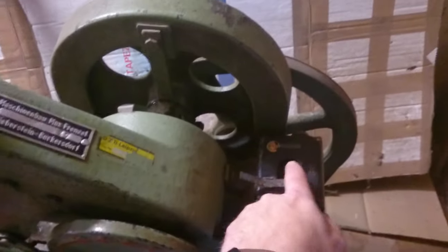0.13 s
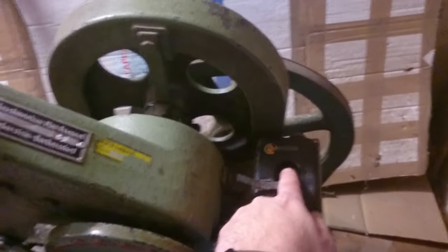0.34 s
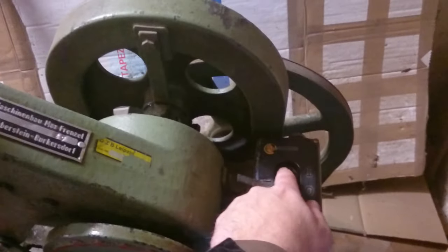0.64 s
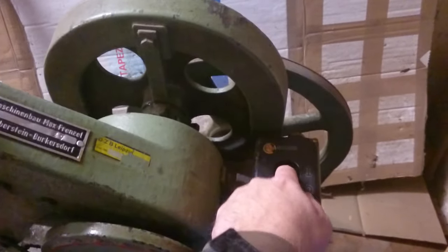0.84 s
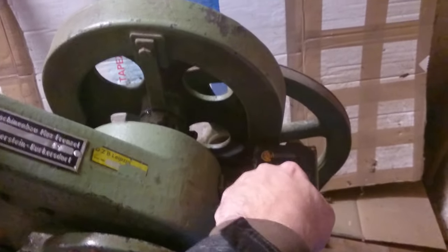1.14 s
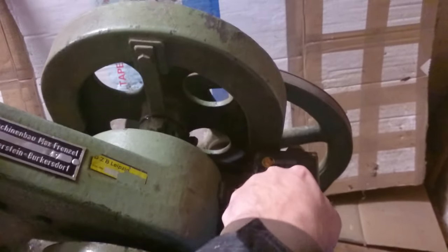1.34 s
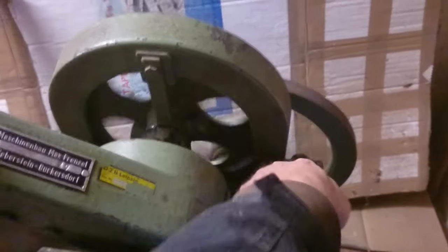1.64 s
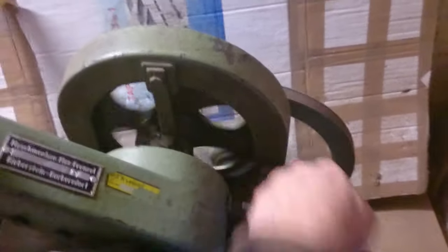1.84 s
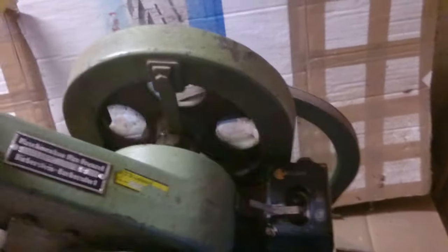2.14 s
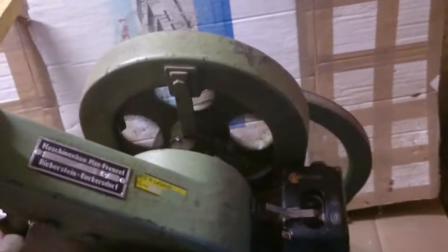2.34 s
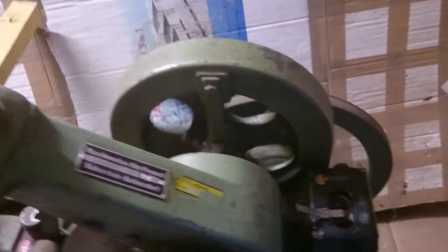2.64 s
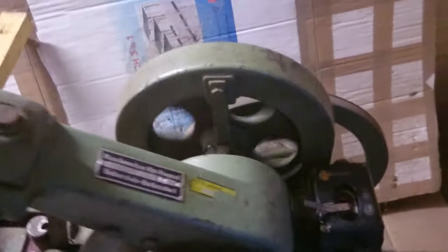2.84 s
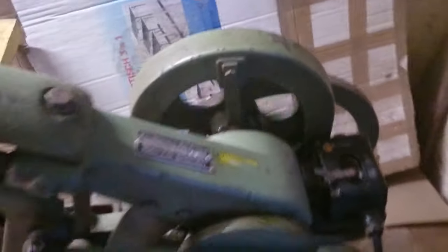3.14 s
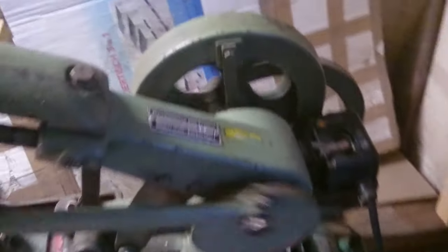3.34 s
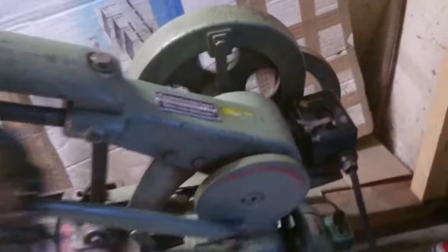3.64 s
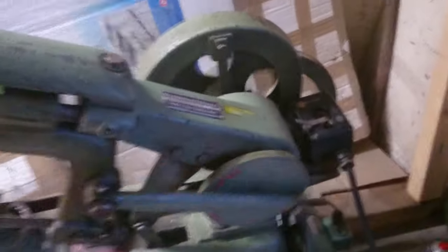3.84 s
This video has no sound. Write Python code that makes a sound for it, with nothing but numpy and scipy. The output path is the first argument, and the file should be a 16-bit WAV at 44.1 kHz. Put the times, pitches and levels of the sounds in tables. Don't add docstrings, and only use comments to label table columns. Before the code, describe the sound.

A power hacksaw starts with a hard knocking jolt and runs with gear rattle and rhythmic metal clacks

```python
import sys
import numpy as np
from scipy import signal
from scipy.fft import rfft, irfft
from scipy.io import wavfile
from scipy.ndimage import uniform_filter1d

SR = 44100
rng = np.random.default_rng(int(sys.argv[2]) if len(sys.argv) > 2 else 0)


def master_out(mix):
    frames = np.transpose(np.atleast_2d(mix))
    ceiling = np.clip(frames, -1, 1)
    pcm = np.round(ceiling * 32767).astype(np.int16)
    wavfile.write(sys.argv[1], SR, pcm)


def volts(x):
    e = np.asarray(x, float) / 20
    return 10 ** e


N = 176400
START_S, START_RISE_S = 1.460, 0.0046
FLICKER_DB = 1.7

# freq_hz, density_db
STILL_COLOUR = [(25, -2), (60, 14.5), (150, -1), (300, -7.5), (1200, -0.5), (3000, -2.5), (6600, -9.5),
                (16000, -43)]
# time_s, level_db
SLEEVE_LEVEL = [(0, -51.5), (.15, -49.5), (.3, -53.5), (.35, -64.5), (.53, -58.5), (.62, -60.5), (.66, -85),
                (.77, -68.5), (.85, -62.5), (1.07, -58), (1.2, -65.5), (1.44, -66)]
# freq_hz, density_db
SLEEVE_COLOUR = [(120, -66), (273, -23), (548, -27.5), (1320, -8), (2000, -12.5), (4600, -12), (6640, -1.5),
                 (16000, -15.5)]
# start_s, peak_db, pitch_hz
TICKS = [
    (0.426, -59, 1320),
    (0.436, -55, 5100),
    (1.13, -49, 1540),
    (1.312, -89.5, 1500),
    (1.376, -44, 1900),
    (1.378, -46.5, 3960),
    (1.394, -50, 1170),
    (1.423, -56, 920),
    (1.449, -53, 965),
]
# time_s, level_db
GEAR_LEVEL = [(1.46, -20.5), (1.62, -27), (1.75, -30.5), (2.0, -30.5), (2.45, -32), (2.7, -30), (3.2, -33),
              (3.4, -28.5), (3.7, -34.5), (4.0, -30.5)]
# freq_hz, density_db
GEAR_COLOUR = [(30, -26), (250, -29.5), (500, -9), (1000, -2), (1350, 5), (2100, -3), (2800, -13),
               (4800, -22)]
FRAME_HZ = [384, 507, 638, 787, 1055, 1254, 1412, 1917, 1975, 2206, 2460, 2650, 3120, 3540]
FRAME_MODE_DB = [-23, -22, -18, -13, -12, -10, -3, 1, 3, -7, -14, -15, -18, -17]
MESH_BAND_HZ = [1700, 2450]
# time_s, gain_db
MESH_GAIN = [(1.46, -27), (1.6, -11), (1.7, -2), (1.95, -1.5), (2.2, 0), (2.35, 2.5), (2.6, 1.5),
             (2.9, -2.5), (3.1, 1), (3.3, 0.5), (3.6, 0.5), (3.75, 2.5), (4.0, 1.5)]
# time_s, level_db
HISS_LEVEL = [(1.46, -49), (1.62, -48), (1.78, -48), (1.82, -53.5), (1.9, -47), (2.03, -49.5), (2.2, -53),
              (2.42, -49.5), (2.6, -52.5), (2.75, -53), (3.2, -54.5), (3.5, -55), (3.7, -56), (3.83, -54.5),
              (4.0, -53.5)]
# freq_hz, density_db
HISS_COLOUR = [(2500, -29), (4500, -15.5), (6700, -2), (8500, -10.5), (10000, -19)]
# start_s, peak_db, pitch_hz
KNOCKS = [(1.46, -14, 1026), (1.465, -12, 1070), (1.468, -6.5, 1430), (1.475, -20, 1320), (1.482, -3, 1058),
          (1.49, -13, 1116), (1.498, -12, 1260), (1.509, -13, 1470), (1.526, -14, 1360), (1.534, -2, 1466),
          (1.553, -13, 1453), (1.558, -21, 1530), (1.56, -7, 1406), (1.576, -26, 1440), (1.608, -29, 1484),
          (2.017, -10, 1234), (2.037, -22, 2170), (2.036, -12, 1254), (2.05, -15, 1180), (2.075, -23, 1340),
          (2.092, -18.5, 1135), (2.786, -9, 2000), (2.79, -33, 1210), (2.797, -19, 1103),
          (2.835, -21, 1350), (2.854, -18.5, 1326), (3.518, -11, 1383), (3.515, -17, 2380),
          (3.517, -27, 4200), (3.521, -29, 1310), (3.529, -14, 1465), (3.537, -14, 2100),
          (3.537, -4.5, 1268), (3.55, -20, 1460), (3.561, -26, 1330), (3.752, -19, 1900),
          (3.761, -13.5, 1430), (3.774, -13, 1253), (3.79, -18, 1900), (3.798, -15, 1490),
          (3.816, -13.5, 1277)]
# start_s, peak_db, t60_s
CLACKS = [(1.462, -22, 0.21), (1.497, -14.5, 0.028), (1.509, -17.5, 0.023), (2.039, -6.5, 0.062),
          (2.049, -16.5, 0.042), (2.3, -19.5, 0.06), (2.7856, -6.5, 0.075), (2.802, -24, 0.091),
          (3.045, -24, 0.19), (3.538, -5.5, 0.078), (3.798, -22, 0.12)]
# freq_hz, density_db
CLACK_COLOUR = [(59, -89), (100, -57), (676, -21), (1250, -2), (2420, -3.5), (4980, -16.5), (6700, -16.5),
                (9210, -27), (16000, -68)]
# freq_hz, level_db, t60_s
CLACK_MODES = [(1118, 0, .08), (1270, 0, .08), (1940, -2, .08), (2450, -6, .08), (3300, -8, .08),
               (6724, -10, .03)]
# start_s, peak_db, t60_s
SNAPS = [
    (1.499, -18, 0.03),
    (1.502, -26.5, 0.032),
    (2.038, -16, 0.028),
    (2.297, -36.5, 0.024),
    (2.7862, -18.5, 0.058),
    (3.048, -44.5, 0.036),
    (3.516, -47, 0.018),
    (3.537, -20.5, 0.072),
    (3.797, -35.5, 0.023),
    (3.894, -45.5, .05),
]
# freq_hz, density_db
SNAP_COLOUR = [(2000, -24), (4200, -6), (6700, 0), (9200, -9), (11000, -23), (14000, -28), (16000, -42)]
# start_s, length_s, level_db
SONGS = [
    (2.298, .065, -22),
    (3.035, .045, -23),
    (1.468, .11, -41),
    (1.715, .03, -46),
    (2.39, .08, -50),
    (3.07, .08, -51),
]
SONG_HZ = [1411, 1410, 4130, 4120, 3560, 3560]
# freq_hz, shared_0_to_1
ALIKE = [(60, .98), (300, .88), (700, .7), (1500, .5), (4000, .45), (12000, .1)]
# freq_hz, left_minus_right_db
PORT_BALANCE = [(60, 0.5), (200, -7.5), (500, -3.5), (1290, -12), (2380, -8.5), (4400, -9.5), (8120, 15),
                (15000, -15.5)]
# freq_hz, gain_db
PAIR_GAIN = [(130, 3.2), (400, 11.33), (900, 6), (1500, 1.47)]
# freq_hz, lead_turns
LEFT_LEAD = [(800, .5), (2000, .92), (2700, .3), (6200, 2.5)]
# freq_hz, width_hz, gain_db
CAVITY = [(6550, 350, 6.5), (9200, 300, 5)]


def curve(rows, x, log=False):
    a = np.array(rows, float)
    if log:
        return np.interp(np.log(x + 1e-9), np.log(a[:, 0]), a[:, 1])
    return np.interp(x, a[:, 0], a[:, 1])


def unit(x):
    return x / np.sqrt(np.mean(x ** 2))


def colour(x, db):
    cepstrum = irfft(db(np.fft.rfftfreq(4096, 1 / SR)) * np.log(10) / 20)
    cepstrum[1:2048] *= 2
    cepstrum[2049:] = 0
    impulse = irfft(np.exp(rfft(cepstrum)))
    return signal.fftconvolve(x, np.atleast_2d(impulse), axes=1)[:, :N]


def tint(x, rows):
    return colour(x, lambda f: curve(rows, f, True))


def ring(x, hz, width_hz):
    return signal.lfilter(*signal.iirpeak(hz, hz / width_hz, SR), x)


def pair(draw):
    spectra = rfft(np.array([draw() for _ in range(3)]))
    shared = np.clip(curve(ALIKE, np.fft.rfftfreq(N, 1 / SR), True), 0, 1)
    return irfft(np.sqrt(shared) * spectra[0] + np.sqrt(1 - shared) * spectra[1:], N)


def noise():
    return rng.standard_normal(N)


def grit(per_s, scatter_db):
    hit, sign, size = rng.random((3, N))
    size_db = scatter_db * np.minimum(-np.log(1 - size), 4)
    return (hit < per_s / SR) * np.sign(sign - .5) * volts(size_db)


def walk(rate_hz):
    k = int(SR / rate_hz)
    return unit(uniform_filter1d(uniform_filter1d(noise(), k), k))


def fade(t, start_s, t60_s, rise_s=0.00035):
    d = np.maximum(t - start_s, 0)
    return (1 - np.exp(-d / rise_s)) * volts(-60 * d / t60_s)


def still_room(running):
    level_db, duck_db = -66, -9
    return unit(tint(pair(noise), STILL_COLOUR)) * volts(level_db + duck_db * running)


def hand(t):
    tick_t60_s, sharpness_q = 0.086, 1.83
    cloth = unit(tint(pair(noise), SLEEVE_COLOUR))
    out = cloth * volts(curve(SLEEVE_LEVEL, t) + FLICKER_DB * walk(19))
    tap = pair(noise)
    for start_s, peak_db, hz in TICKS:
        width_hz = hz / sharpness_q
        tone = unit(ring(ring(tap, hz, width_hz), hz, width_hz))
        out = out + volts(peak_db) * fade(t, start_s, tick_t60_s) * tone
    return out


def rumble():
    hz, level_db = 55, -60
    return unit(ring(ring(pair(noise), hz, 62), hz, 135)) * volts(level_db)


def gears(t):
    teeth_per_s, scatter_db = 2500, 3.6
    body_top_hz, width_hz, wobble_db = 4200, 22, 2.5
    frame_db, spin_up_s, spin_up_db = 1.5, .35, -10
    teeth = pair(lambda: grit(teeth_per_s, scatter_db))

    def body_db(f):
        return curve(GEAR_COLOUR, f, True) - 30 * np.log2(np.maximum(f / body_top_hz, 1))

    body = unit(colour(teeth, body_db))
    modes = 0
    for hz, db in zip(FRAME_HZ, FRAME_MODE_DB):
        mode = ring(ring(teeth, hz, width_hz), hz, 8 * width_hz)
        modes = modes + volts(db + wobble_db * walk(7.2)) * mode
    settle_db = spin_up_db * np.clip(1 - (t - START_S) / spin_up_s, 0, 1)
    whole = body * volts(FLICKER_DB * walk(37)) + volts(frame_db + settle_db) * unit(modes)
    mesh_filter = signal.butter(3, MESH_BAND_HZ, "band", fs=SR, output="sos")
    mesh = signal.sosfiltfilt(mesh_filter, whole)
    return (whole + (volts(curve(MESH_GAIN, t)) - 1) * mesh) * volts(curve(GEAR_LEVEL, t) - 3.5)


def hiss(t):
    air_hz, air_db, air_steep = 9500, -63, 2.0
    level_db = curve(HISS_LEVEL, t)

    def band_db(f):
        return curve(HISS_COLOUR, f, True) - 30 * (f < 2000) - 25 * (f > air_hz)

    def top_db(f):
        return -40. * (f < air_hz) - 9.6 * np.log2(f / air_hz + .5)

    band = unit(colour(pair(noise), band_db))
    air = unit(colour(pair(noise), top_db))
    air_level_db = air_db + air_steep * (level_db + 51.5)
    return volts(level_db + FLICKER_DB * walk(30)) * band + volts(air_level_db) * air


def knocks(t):
    width_hz, push_s, t60_s = 570, 0.0031, .05
    thud_hz, thud_db, pure = 127, -48, .75
    shake, out = pair(noise), 0
    thud = volts(thud_db) * unit(ring(shake, thud_hz, 120))
    for start_s, peak_db, hz in KNOCKS:
        patch = unit(ring(ring(shake, hz, width_hz), hz, 3 * width_hz))
        tone = pure * np.sin(2 * np.pi * hz * (t - start_s)) + (1 - pure) * patch
        out = out + volts(peak_db) * fade(t, start_s, t60_s, push_s) * (tone + thud)
    return out


def clacks(t):
    level_db, ring_db = -6, -12.5
    tail_db, tail_t60_s, tail_rise_s = -18.5, .5, 0.011
    loose_per_s, loose_db, loose_after_s = 220, 3.5, .012
    env, loose = 0, 1
    for start_s, peak_db, t60_s in CLACKS:
        tail = volts(tail_db) * fade(t, start_s, tail_t60_s, tail_rise_s)
        env = env + volts(peak_db) * (fade(t, start_s, t60_s) + tail)
        loose = loose * np.where(t < start_s, 1, 1 - np.exp(-np.abs(t - start_s) / loose_after_s))
    rattle = unit(pair(lambda: grit(9000, 3.0)))
    gain = np.std(tint(rattle, CLACK_COLOUR))
    blow = rattle * env * volts(loose_db * loose * walk(loose_per_s))
    modes = 0
    for hz, db, t60_s in CLACK_MODES:
        modes = modes + volts(db) * ring(blow, hz, 1.2 / t60_s) * np.sqrt(t60_s * SR / 7)
    snap_env = sum(volts(peak_db) * fade(t, start_s, t60_s) for start_s, peak_db, t60_s in SNAPS)
    snap = unit(tint(rattle, SNAP_COLOUR)) * snap_env
    return snap + volts(level_db) * (tint(blow, CLACK_COLOUR) / gain + volts(ring_db) * modes)


def songs(t):
    rise_s, t60_s = .008, .1
    out = 0
    for hz, (start_s, length_s, level_db) in zip(SONG_HZ, SONGS):
        fall_db = -60 * np.maximum(t - start_s - length_s, 0) / t60_s
        env = np.clip((t - start_s) / rise_s, 0, 1) * volts(level_db + fall_db)
        out = out + env * np.sin(2 * np.pi * hz * t)
    return out * volts(FLICKER_DB * walk(85)) * np.ones((2, 1))


def wall_echo(near, t):
    level_db, delay_s, t60_s, rise_s = -11, 0.014, .28, 0.0025
    d = t[:SR // 2]
    walls = pair(noise)[:, :len(d)] * fade(d, delay_s, t60_s, rise_s)
    walls = walls / np.sqrt(np.sum(walls ** 2) / 2)
    return volts(level_db) * signal.fftconvolve(near, walls, axes=1)[:, :N]


def scene():
    t = np.arange(N) / SR
    running = np.clip((t - START_S) / START_RISE_S, 0, 1)
    machine = running * (rumble() + gears(t) + hiss(t))
    near = hand(t) + machine + knocks(t) + clacks(t) + songs(t)
    return near + wall_echo(near, t) + still_room(running)


def low_pass(x):
    return signal.sosfilt(signal.butter(12, 16630, fs=SR, output="sos"), x)


def record(dry):
    limit, top_hz = 1.3, 15950
    f = np.fft.rfftfreq(N, 1 / SR)
    side = np.array([[1], [-1]])
    balance = np.sqrt((1 + volts(-2 * side * curve(PORT_BALANCE, f, True))) / 2)
    gain = volts(curve(PAIR_GAIN, f, True)) / balance
    lead = np.exp(1j * np.pi * (1 + side) * curve(LEFT_LEAD, f))
    left, right = irfft(rfft(dry) * gain * lead, N)
    left = left + sum((volts(db) - 1) * ring(left, hz, width_hz) for hz, width_hz, db in CAVITY)
    held = limit * np.tanh(np.array([left, right]) / limit)
    mix = irfft(rfft(held) * (f < top_hz), N)
    return low_pass(mix)


dry = scene()
out = record(dry)
master_out(out)
```